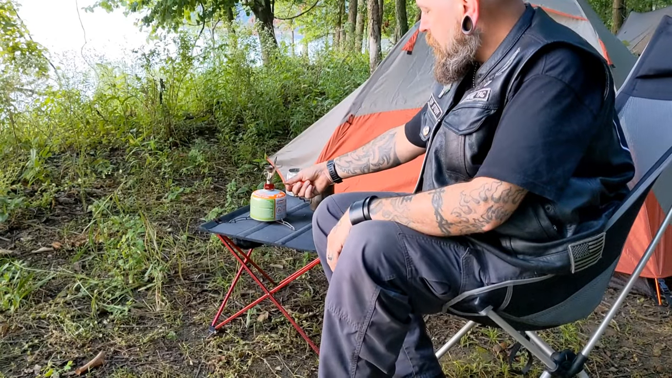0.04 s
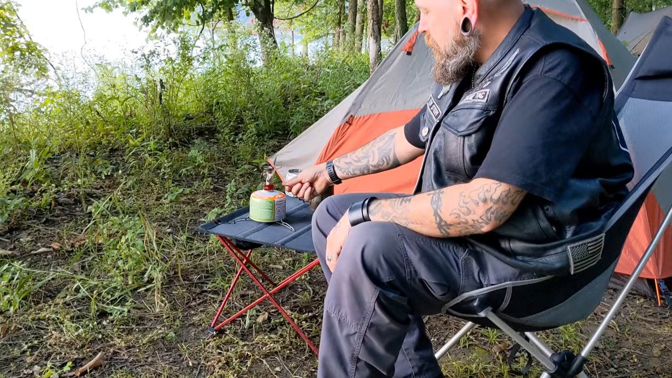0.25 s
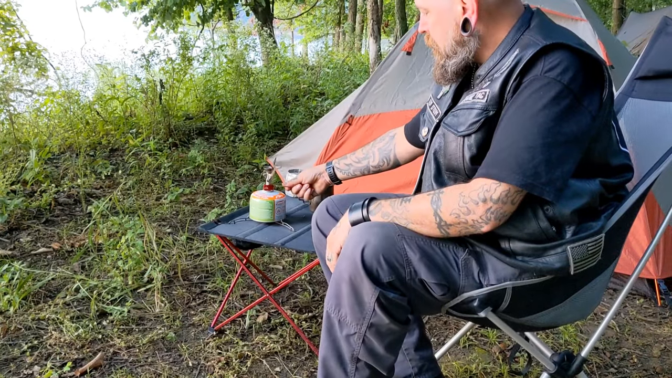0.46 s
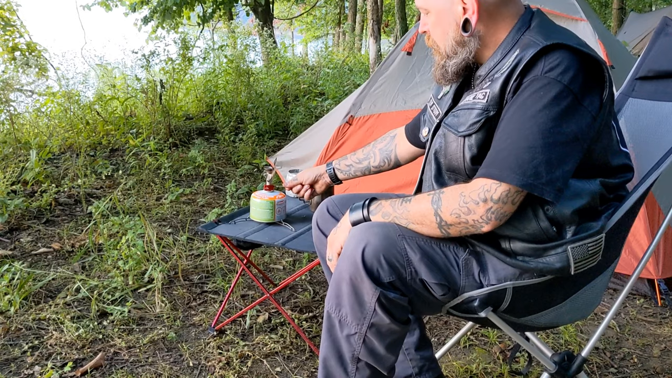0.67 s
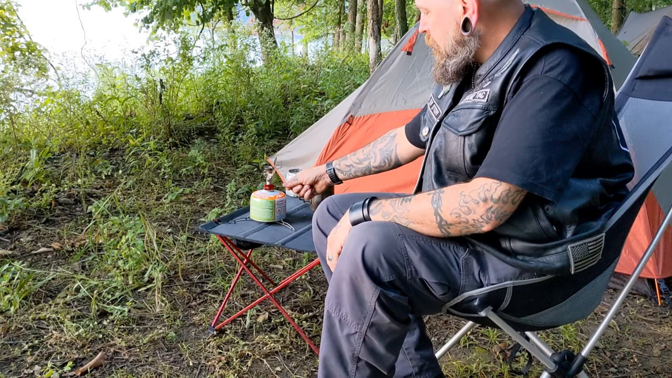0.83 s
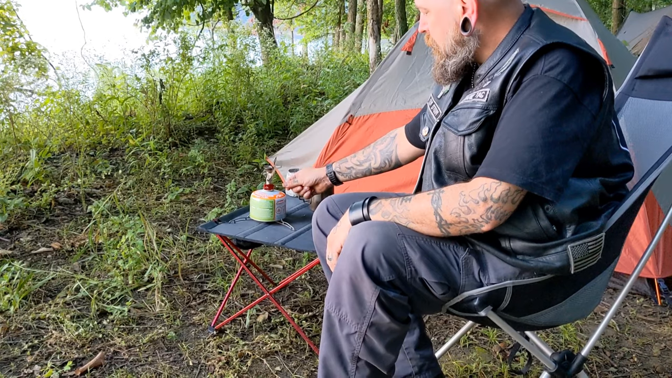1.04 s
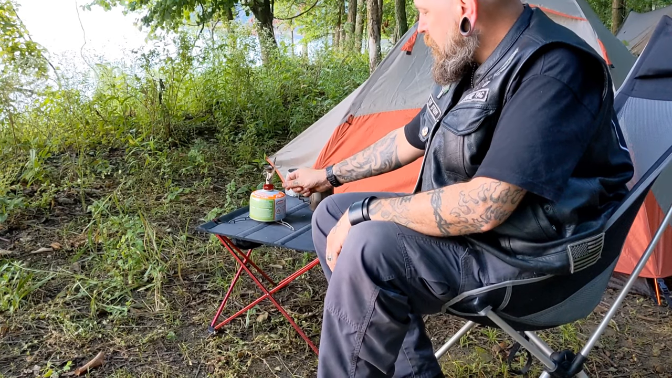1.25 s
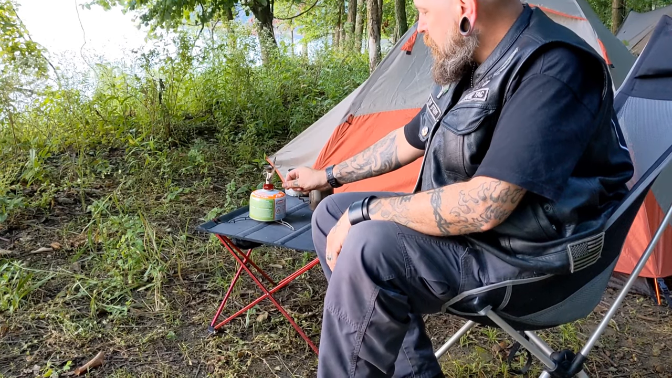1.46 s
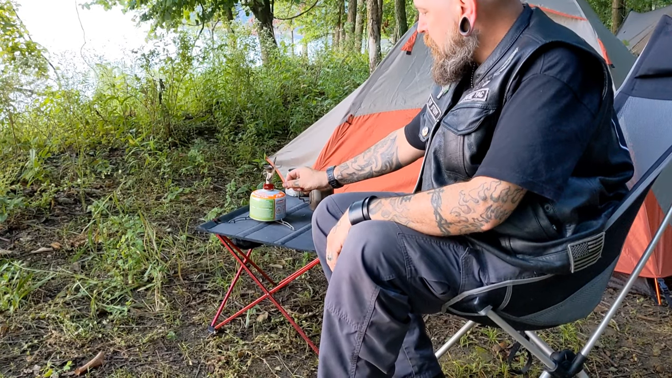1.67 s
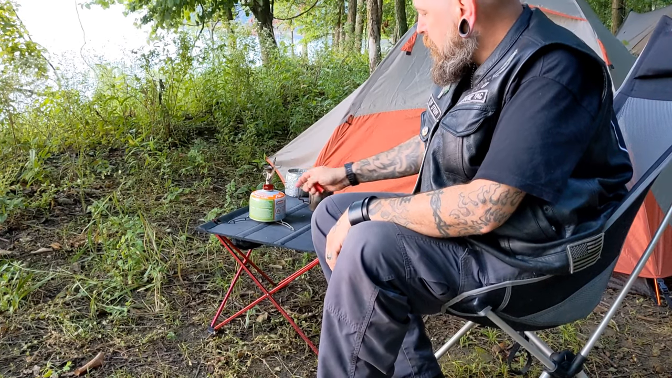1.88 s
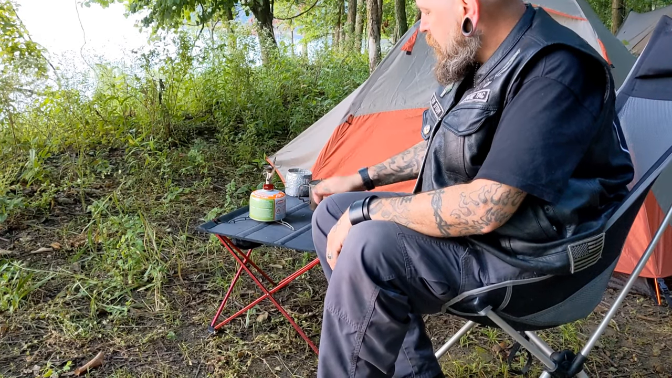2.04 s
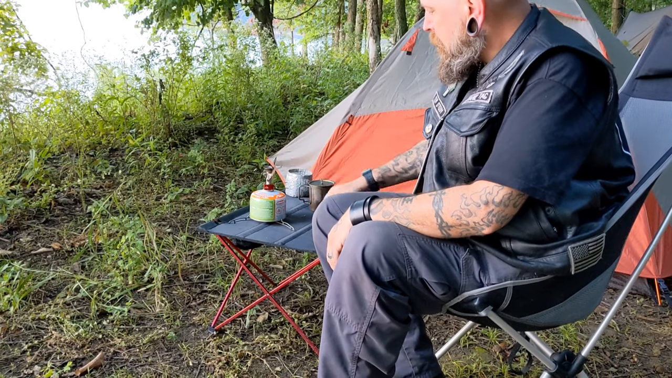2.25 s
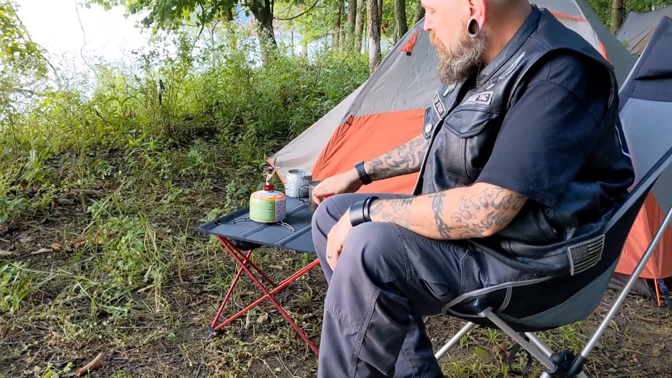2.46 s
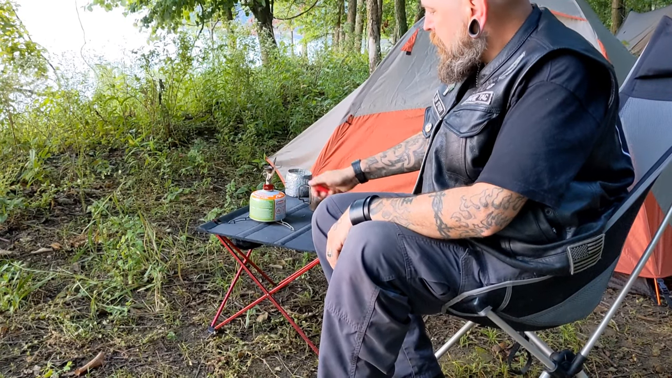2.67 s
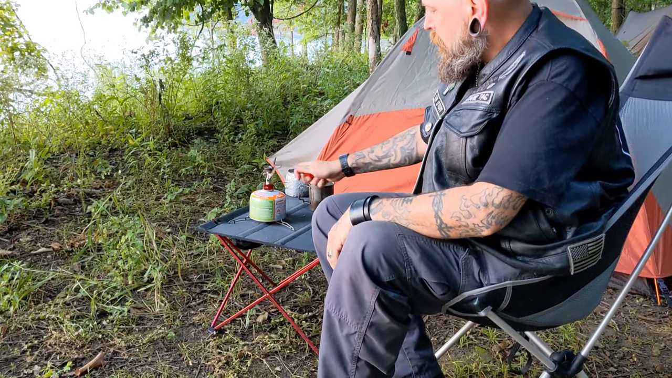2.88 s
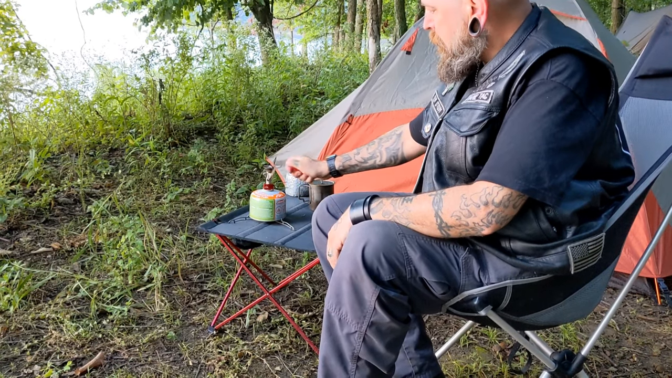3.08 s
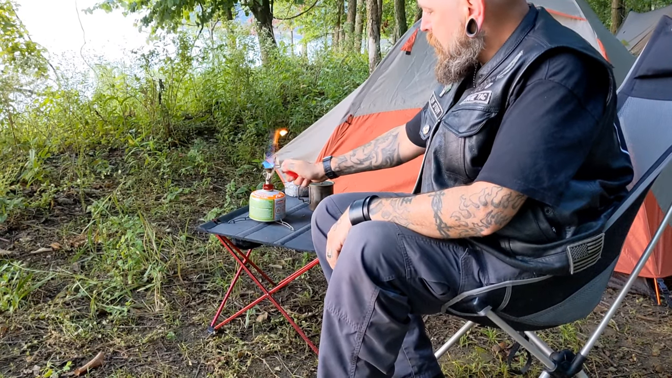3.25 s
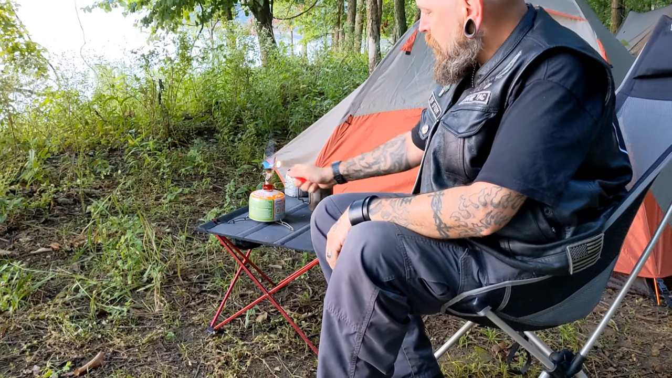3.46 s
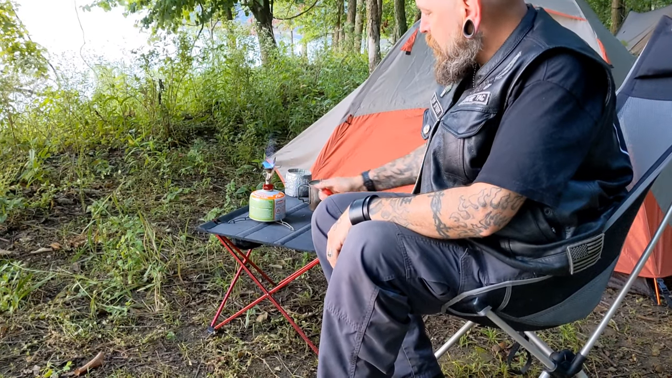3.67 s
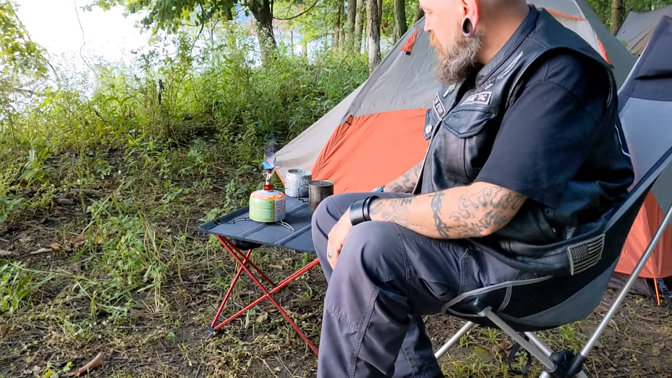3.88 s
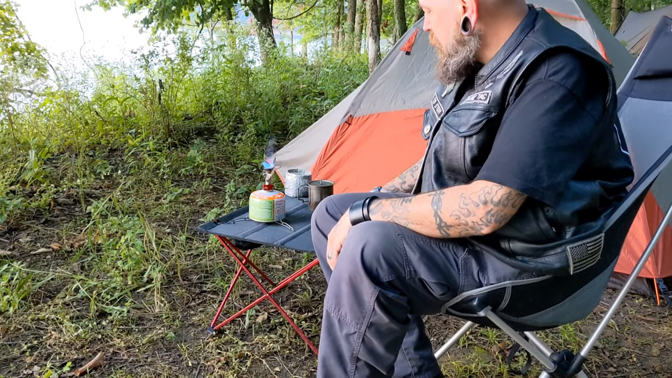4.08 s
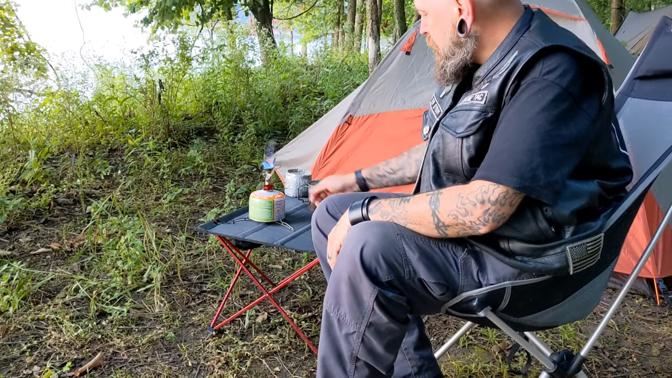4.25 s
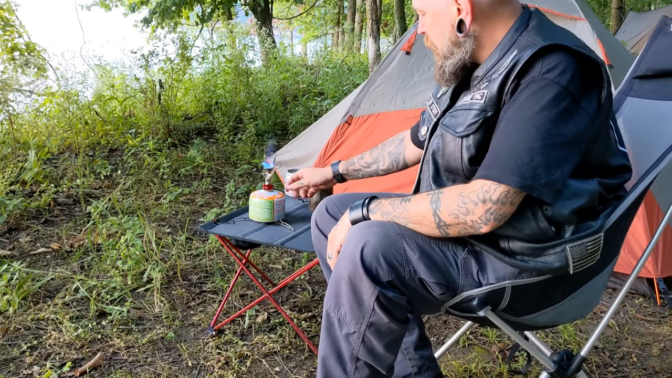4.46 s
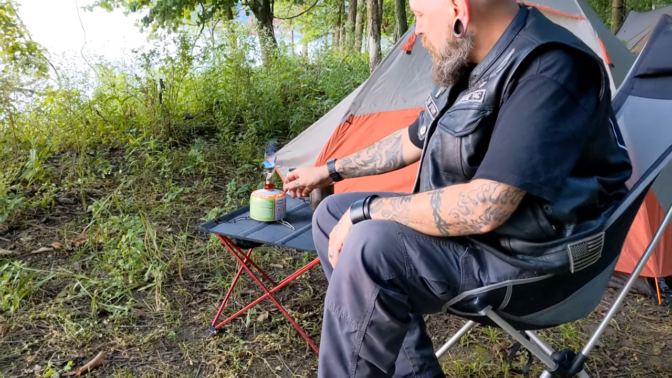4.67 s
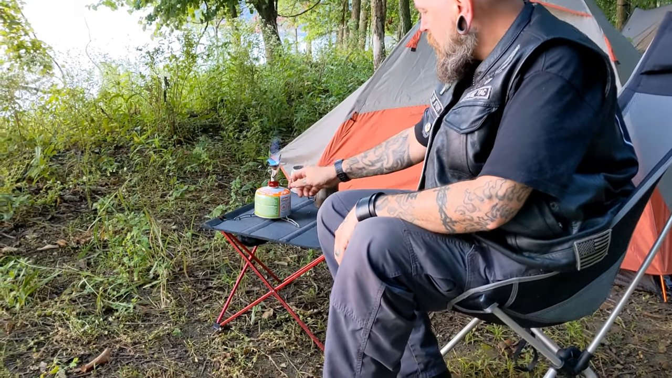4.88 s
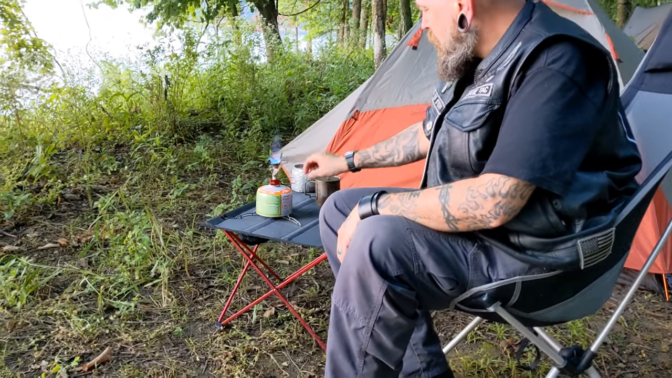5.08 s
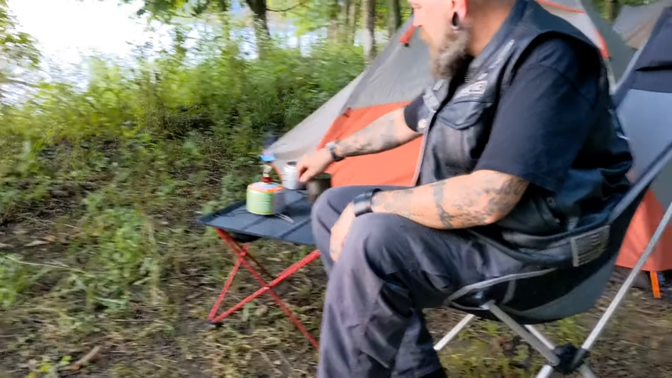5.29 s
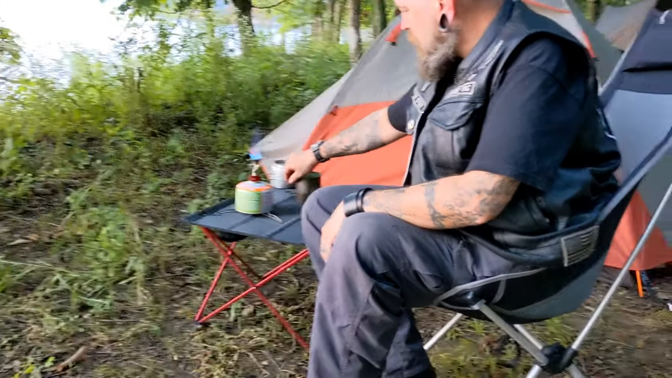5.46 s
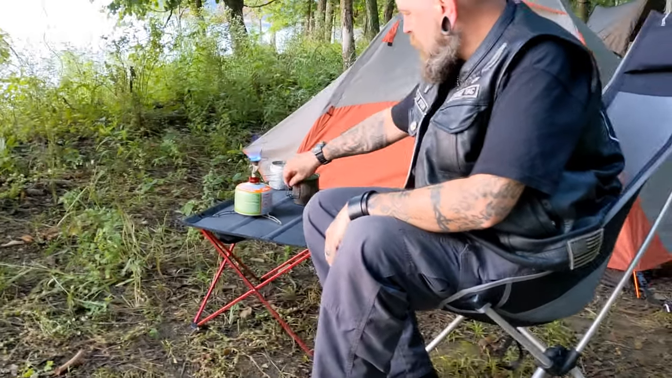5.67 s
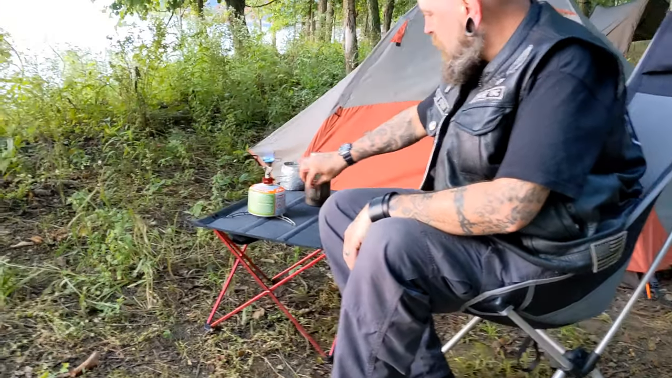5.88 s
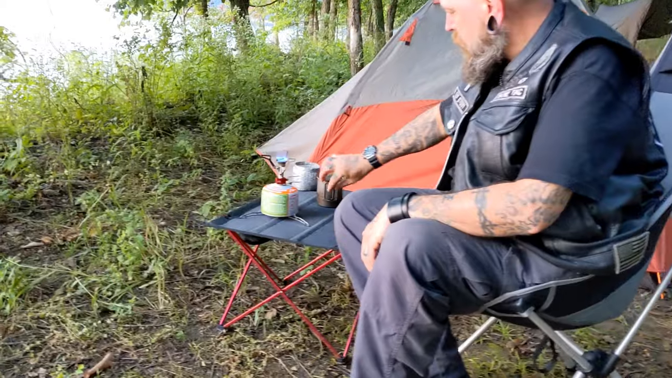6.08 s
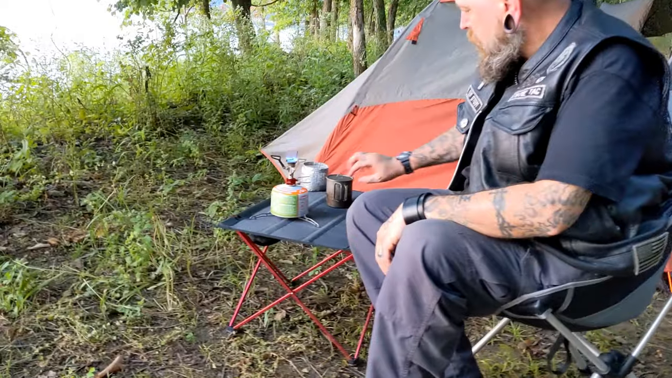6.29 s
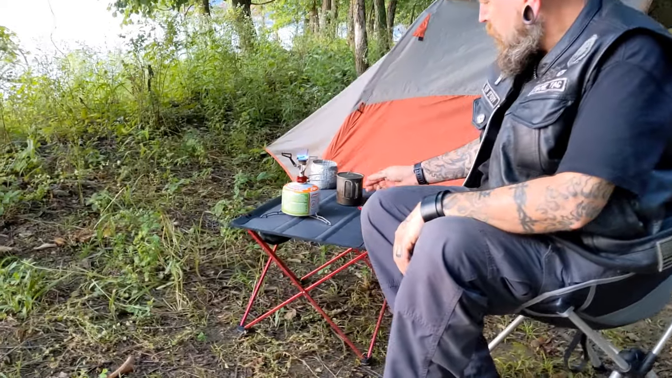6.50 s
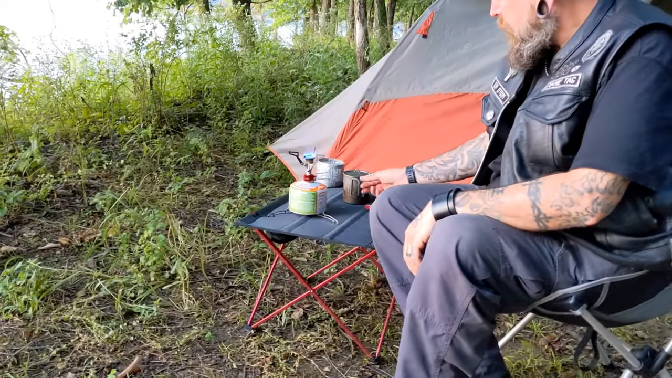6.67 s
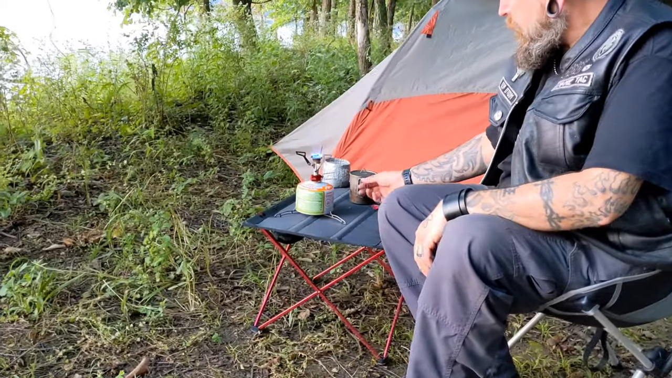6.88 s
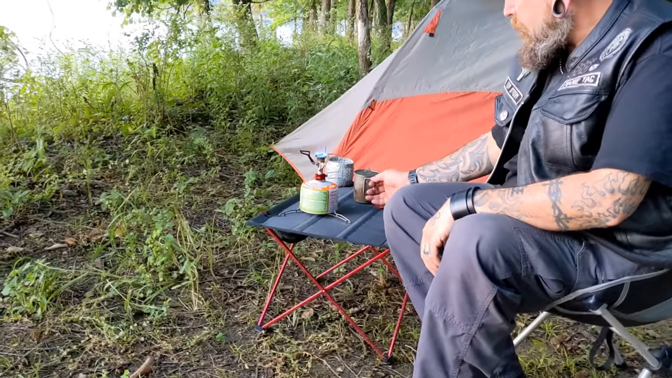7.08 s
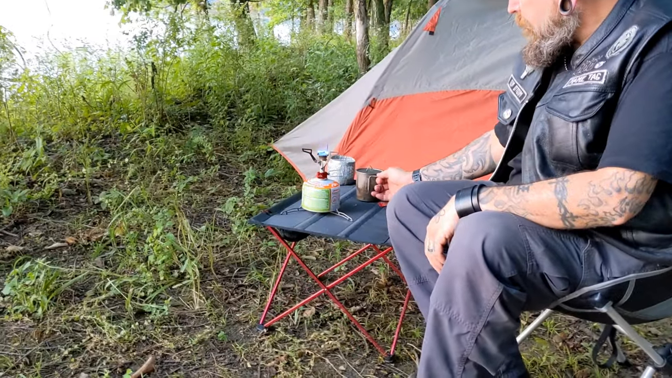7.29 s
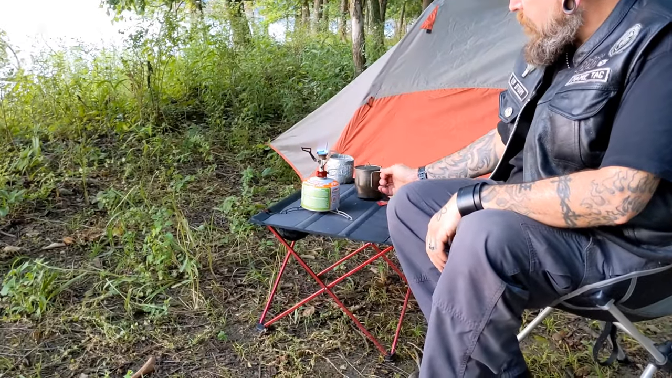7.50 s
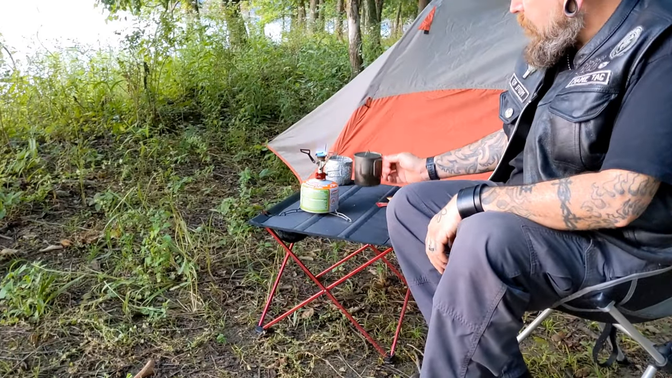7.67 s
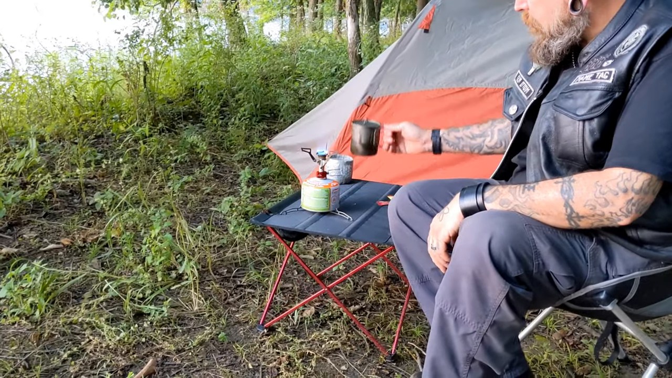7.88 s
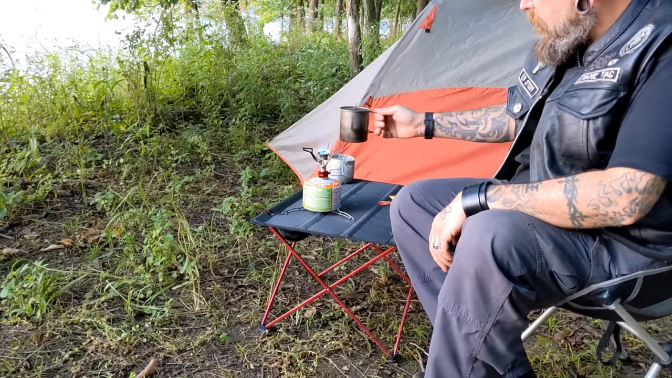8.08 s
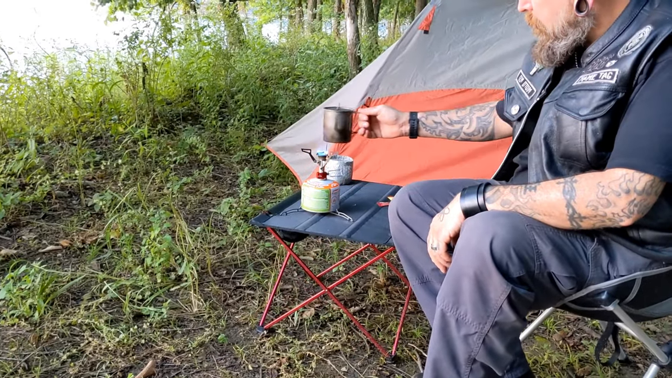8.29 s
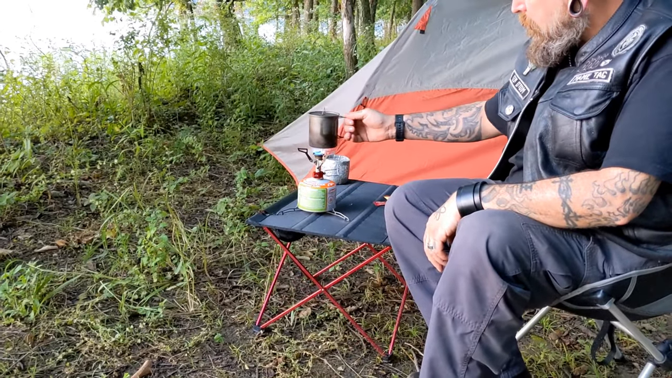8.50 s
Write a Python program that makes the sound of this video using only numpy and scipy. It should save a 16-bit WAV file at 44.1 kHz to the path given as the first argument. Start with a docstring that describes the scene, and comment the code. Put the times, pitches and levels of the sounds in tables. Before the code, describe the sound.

A quiet wooded campsite in stereo, with the microphone near a small gas stove. From 0 s a distant engine drones low and steady, leaning left, with dull rumble, soft wind buffets strongest near 0.6 s, faint leaves and thin high crickets. Birds chirp, warble and trill with slight woodland echo until about 3.2 s. At about 1.4 s the gas valve opens: a bright turbulent hiss swells, peaks near 1.8 s and settles. At 3.25 s a sharp double lighter click is followed at 3.3 s by a crackling whump and short flare, becoming a fluttering burner roar with airy jet hiss. It strengthens gradually to 8.5 s, its tone shifting around 6 s as the microphone moves. A tiny knock comes at 4.15 s, a thin tick at 5.55 s, a metal cup tapping down with a short rattling ring at 6.16 s, and another faint tick at 7.07 s.

```python
"""Camp stove lit in the woods

A gas valve opens and hisses, a lighter clicks, the gas catches with a thump and the burner roars on: coloured
noise with tabled levels, plus short pressure swings. A distant engine drones as sines over rumble, wind buffets
the microphone as low noise, birds are gliding sines with echoes, crickets are resonant noise. Ticks are noise
through metal resonances; a cup set down rings as decaying sines. Two channels: the microphone's ports."""
import sys
import numpy as np
from scipy import signal
from scipy.fft import rfft, irfft, next_fast_len
from scipy.io import wavfile

SR = 44100
rng = np.random.default_rng(int(sys.argv[2]) if len(sys.argv) > 2 else 0)


def wrap_up_sound(samples):
    """Save the sound to the file named by the first command line argument, as 16-bit audio."""
    columns = np.atleast_2d(samples).T
    # keep every value between -1 and 1, then stretch to whole-number steps
    tamed = np.clip(columns, -1, 1)
    steps = np.round(tamed * 32767).astype(np.int16)
    wavfile.write(sys.argv[1], SR, steps)


N = 376613


def undb(db):
    """Amplitude ratio of a level in dB."""
    return 10 ** (np.asarray(db) / 20)


def unit(x):
    """Scale to rms 1."""
    return x / np.sqrt(np.mean(x ** 2))


def decay(t, t60_s):
    """Exponential decay that falls 60 dB in t60_s."""
    return np.exp(-np.log(1000) * t / t60_s)


def curve(table):
    """Columns of a (t/s, ...) table as values per sample."""
    s, *columns = np.transpose(table)
    return [np.interp(np.arange(N) / SR, s, c) for c in columns]


def across(table, hz):
    """A (f/Hz, value) table read on a log-frequency axis."""
    f, v = np.transpose(table)
    return np.interp(np.log(hz + 1), np.log(f + 1), v)


def walk(rate_hz):
    """Random levels, rate_hz a second, joined smoothly; spread near 1."""
    levels = rng.standard_normal(int(N * rate_hz / SR) + 2)
    place = np.arange(N) * rate_hz / SR
    k = place.astype(int)
    blend = np.sin(np.pi / 2 * (place - k)) ** 2
    return levels[k] + (levels[k + 1] - levels[k]) * blend


def pan(left_minus_right_db):
    """Left and right gains of a level difference."""
    return undb(np.array([left_minus_right_db, -left_minus_right_db]) / 2)


def band(x, hz, width_hz):
    """A resonance of the given centre and width."""
    return signal.lfilter(*signal.iirpeak(hz, hz / width_hz, fs=SR), x)


def highpass(x, hz):
    """Second-order high-pass."""
    return signal.sosfilt(signal.butter(2, hz, "high", fs=SR, output="sos"), x)


# housing's effect at the ports on sound from ahead: f/Hz, left phase lead/rad, left minus right/dB
PORT_RESPONSE = [(350, -.2, .5), (600, -.09, .7), (1150, -.04, .3), (1450, -.09, -2.7), (1700, .2, -4.5),
                 (2070, 1.1, -4), (2410, 2.3, 1), (2720, 2.2, 5), (3700, 1.2, 7), (3960, 0.4, 6),
                 (4600, 0.1, 0.6), (5500, 2.2, 1.1), (6000, 2.6, 1.1), (8350, 3.5, 3), (11600, 4.5, 2.5),
                 (13100, 5.5, -1.5), (16000, 6.2, -2.1)]


def noise(colour, alike, ahead, centres_hz, flicker_db, rate_hz):
    """Two-port coloured noise in bands that each flicker; rms 1 in sum."""
    size = next_fast_len(N)
    hz = np.fft.rfftfreq(size, 1 / SR)
    gain = undb(across(colour, hz)) * (hz > colour[0][0]) * (hz < colour[-1][0])
    common, left, right = rfft(rng.standard_normal((3, size)))
    share = np.clip(across(alike, hz), 0, 1)  # power common to both ports
    port_hz, phase, side_db = np.transpose(PORT_RESPONSE)
    turn = np.exp(.5j * np.interp(hz, port_hz, phase)) if ahead else 1
    gain = gain * pan(np.interp(hz, port_hz, side_db) * ahead)
    shared, own = np.sqrt(share) * common, np.sqrt(1 - share)
    pair = gain * np.array([shared * turn + own * left, shared / turn + own * right])
    parts = []
    for one in np.eye(len(centres_hz)):
        part = across(list(zip(centres_hz, one)), hz)
        parts.append(irfft(pair * part, size)[:, :N] * undb(flicker_db * walk(rate_hz)))
    parts = np.array(parts)
    return parts / np.sqrt(np.mean(parts.sum(axis=0) ** 2))


CRANK_HZ = 26.34
# strongest engine line, 6 x crank rate: t/s, level/dB, left minus right/dB
MAIN_LINE = [(0, -47, 11.5), (1.28, -48, 14.5), (2.45, -44.5, 14), (3.69, -47, 17), (3.88, -50.5, 21.5),
             (4.3, -47.5, 16.5), (5.2, -47, 15), (5.6, -50, 19.5), (5.9, -47, 16), (6.49, -45.5, 11.5),
             (7.3, -46, 9), (8.54, -44.5, 6.5)]
# weaker engine lines: multiple of crank rate, mean level/dB, left minus right/dB
WEAK_LINES = [(3.043, -61.5, -2), (3.494, -54, 4), (7.01, -59.5, 1.5), (7.79, -78.5, 19),
              (10.63, -73, 18.5), (15.3, -81.5, 11), (17.58, -75.5, -4), (24.3, -79.5, -3)]
# upper part of the engine rumble: t/s, level/dB
UPPER_RUMBLE = [(0, -62), (1, -56), (2.4, -50.5), (3.6, -51), (5, -51.5), (6.6, -57), (7.5, -58.5),
                (8.54, -57)]
# rumble spectrum: f/Hz, relative density/dB
RUMBLE_SPECTRUM = [(40, -13), (60, 3.5), (90, 1), (130, 4), (220, 2.5), (300, -8), (450, -13.5), (680, -16),
                   (800, -47)]


def engine():
    """Steady lines on the crank rate that waver on their way through the air, over a dull rumble."""
    turn = 2 * np.pi * CRANK_HZ * np.arange(N) / SR
    db, pan_db = curve(MAIN_LINE)
    phase = 6 * turn + 0.25 * walk(7.6) + np.array([[-.15], [.15]])
    lines = np.sqrt(2) * np.sin(phase) * undb(db + 0.34 * walk(17)) * pan(pan_db)
    upper_db, = curve(UPPER_RUMBLE)
    for k, line_db, side_db in WEAK_LINES:
        # the higher lines come and go with the upper rumble
        line_db = line_db + min(k / 20, 1) * (upper_db - upper_db.mean())
        phase = k * turn + 0.12 * k * walk(5) + rng.uniform(0, 2 * np.pi)
        lines += np.sqrt(2) * np.sin(phase) * undb(line_db + 1.6 * walk(2.32)) * pan(side_db)[:, None]
    low, high = noise(RUMBLE_SPECTRUM, [(60, 0.93), (600, 0.92)], False, [90, 260], 0.46, 3.2)
    return lines + (low * undb(-51) + high * undb(upper_db)) * pan(4.6)[:, None]


# gusts on the microphone: t/s, peak of the level envelope/dB
GUST_PEAKS = [(.15, -54), (.6, -43), (1.5, -51), (1.95, -47), (2.72, -62), (3.25, -59), (3.93, -62),
              (4.5, -56), (5.55, -56), (5.85, -54), (6.15, -53), (6.6, -54), (6.93, -59), (7.75, -60)]
GUST_SIGMA_S, BREEZE_DB = 0.1, -69  # Gaussian gust; median level between gusts


def wind():
    """Low buffets that push one port while they pull the other."""
    colour = [(26, -30), (40, 6), (52, -12), (75, -4), (150, -24)]
    buffets, = noise(colour, [(50, 0.91)], False, [50], 3.8, 11.0)
    t = np.arange(0, N / SR, .01)
    swell = sum(undb(db) * np.exp(-.5 * ((t - s) / GUST_SIGMA_S) ** 2) for s, db in GUST_PEAKS)
    swell, = curve(np.transpose([t, swell]))
    force = undb(BREEZE_DB + 3.0 * walk(3)) + swell
    return buffets * force * np.array([[1], [-1]])


# far leaves: f/Hz, relative density/dB
LEAF_SPECTRUM = [(290, -40), (500, -10), (748, -7.5), (1390, -1), (1650, -7.5), (2470, -4), (3490, -10),
                 (4520, -9.5), (5150, -4), (5950, -13.5), (11500, -13), (15600, -27)]
LEAVES_DB = -63.5


def leaves():
    """Far leaves: faint broad noise, mostly unrelated at the two ports."""
    alike = [(600, 0.86), (1400, 0.18), (3000, 0.073)]
    return noise(LEAF_SPECTRUM, alike, True, [3000], 0.68, 3.6)[0] * undb(LEAVES_DB)


CRICKET_HZ, CHORUS_DB = 5215, -70  # narrow line; level of the wide band


def crickets():
    """A chorus of resonant noise: a wide band plus a narrow one that throbs irregularly."""
    hiss = rng.standard_normal((2, N))
    wide = unit(band(band(hiss, 5060, 600.), 5060, 600.))
    narrow = unit(band(hiss, CRICKET_HZ, 90.)) * undb(2.6 * walk(45))
    return (wide + 0.92 * narrow) * undb(CHORUS_DB)


# bird notes: t/s, length/s, start f/Hz, end f/Hz, level before mixing/dB, left minus right/dB
BIRD_NOTES = [(.272, .032, 3100, 2700, -64, 4), (.3, 0.039, 2550, 2490, -66, 0),
              (.328, 0.061, 2470, 2310, -61.5, -2), (.385, .06, 2400, 2330, -73, 0),
              (.27, .05, 4080, 4170, -75, 2), (.52, 0.045, 2490, 2460, -69, -3),
              (0.545, 0.021, 2390, 2100, -62, 2), (0.575, 0.07, 2090, 2080, -67, 0),
              (.545, .025, 3980, 4200, -74, 2), (.765, .05, 3200, 3120, -71, 2),
              (0.866, 0.036, 3800, 3120, -65, 6), (0.901, .05, 3120, 2280, -65, 6),
              (1.055, .055, 3060, 3050, -67, 2), (1.106, 0.06, 3120, 2120, -62, 4),
              (1.135, .045, 2520, 2460, -67, 2), (1.198, 0.068, 2460, 2520, -65, 2),
              (1.228, 0.029, 2660, 2970, -61, 7), (1.263, .045, 2910, 2880, -58.5, 5),
              (1.3, .1, 2870, 2850, -71, 2), (1.48, 0.075, 2500, 2500, -69, 4),
              (1.557, 0.031, 2800, 2770, -59.5, 11), (1.608, 0.025, 2420, 2150, -58, -2),
              (1.708, 0.062, 2390, 2130, -60, 0), (1.827, .04, 3050, 3150, -70, 4),
              (2.16, .04, 3050, 2820, -62, 4), (2.207, 0.094, 3020, 3120, -66, 7),
              (2.706, 0.05, 3100, 2740, -62, 4), (2.783, 0.065, 2550, 2450, -62, 2),
              (2.845, .065, 2470, 2400, -70, 0), (2.865, 0.055, 4480, 4680, -66, 0),
              (2.948, 0.03, 3150, 3480, -62, 4), (2.973, .035, 2680, 3060, -61, 3),
              (2.975, 0.075, 4540, 4200, -66, 2), (3.057, 0.024, 3260, 2880, -59, 4),
              (3.075, .09, 3300, 3720, -68, 3), (3.123, .03, 2600, 2300, -68, 2)]
# phrase repeats of a small high-voiced bird: t/s, level before note offset and mixing/dB
PHRASE_STARTS = [(-.06, -67), (0.678, -67), (1.27, -67), (1.86, -67), (2.449, -64.5)]
# its two falling notes: delay/s, length/s, start f/Hz, end f/Hz, level offset/dB, left minus right/dB
PHRASE_NOTES = [(-.03, .26, 6850, 5560, -4, -11), (.03, .22, 7850, 6640, -3.5, -1)]
# fluttering notes: t/s, length/s, start f/Hz, end f/Hz, level before beat and mixing/dB,
# left minus right/dB, beat rate/Hz, pitch swing/1
TRILL_NOTES = [(0, 0.042, 3230, 3000, -65.5, 6, 39, 0.12), (.05, .07, 3510, 4050, -73, 1, 50, .04),
               (0.139, 0.12, 2580, 2560, -64, 5, 68, 0.06), (0.867, .085, 3830, 3940, -69.5, 8, 63, .04),
               (0.941, 0.07, 3200, 3600, -67, 4, 50, 0.1)]
TRILL_BEAT = .65  # amplitude modulation depth
NOTE_SHARE, ECHO_SHARE = .85, .62  # direct and echo gains


def birds():
    """Gliding, warbling sines, blurred by decaying-noise echoes among the trees."""
    notes, warble, shrill, throb = np.zeros((2, N)), walk(160), walk(170), walk(90)
    phrases = [(s + late, length, hz0, hz1, db + note_db, pan_db) for s, db in PHRASE_STARTS
               for late, length, hz0, hz1, note_db, pan_db in PHRASE_NOTES]
    for s, length, hz0, hz1, db, pan_db in BIRD_NOTES + phrases:
        # a note that starts before zero enters partway
        u = np.arange(max(-int(s * SR), 0), int(length * SR)) / (length * SR)
        i = max(int(s * SR), 0)
        span = slice(i, i + len(u))
        # the small high-voiced bird warbles more widely
        wobble = 0.041 * shrill[span] if hz0 > 5000 else 0.0217 * warble[span]
        hz = (hz0 + (hz1 - hz0) * u) * (1 + wobble)
        note = np.sin(2 * np.pi * np.cumsum(hz) / SR) * np.sqrt(np.sin(np.pi * u)) * undb(1.9 * throb[span])
        notes[:, span] += undb(db) * pan(pan_db)[:, None] * note
    for s, length, hz0, hz1, db, pan_db, rate_hz, swing in TRILL_NOTES:
        t = np.arange(int(length * SR)) / SR
        i = int(s * SR)
        span = slice(i, i + len(t))
        beat = 2 * np.pi * rate_hz * t + 0.88 * throb[span]
        hz = (hz0 + (hz1 - hz0) * t / length) * (1 + swing * np.cos(beat) + 0.014 * warble[span])
        envelope = np.sin(np.pi * t / length) ** .3 * (1 + TRILL_BEAT * np.sin(beat))
        note = np.sin(2 * np.pi * np.cumsum(hz) / SR) * envelope
        notes[:, span] += undb(db) * pan(pan_db)[:, None] * note
    t = np.arange(SR // 3) / SR
    trees = rng.standard_normal((2, len(t))) * decay(t, 0.4) * np.clip(t / 0.017, 0, 1)
    echoes = signal.fftconvolve(notes, trees / np.sqrt(np.sum(trees ** 2) / 2), axes=1)[:, :N]
    return NOTE_SHARE * notes + ECHO_SHARE * echoes


# late path off the table top, changing as the microphone shifts: t/s, left delay/ms, right delay/ms
BOUNCE_DELAYS = [(0, 0.69, 0.59), (5.3, 0.61, 0.87), (6.2, 0.69, 0.57), (7, 0.73, 0.69), (8.54, 0.88, 0.78)]
BOUNCE_SHARE = 0.16  # amplitude of the late copy


def bounce(x):
    """Adds the late copy, which combs the hiss into drifting ridges."""
    place = np.arange(N)
    late = [np.interp(place - ms * SR / 1000, place, side) for side, ms in zip(x, curve(BOUNCE_DELAYS))]
    return x + BOUNCE_SHARE * np.array(late)


LIGHTS_S = 3.2935  # the gas catches
# gas and flame: f/Hz, power share common to both ports
STOVE_COMMON = [(300, 0.95), (700, 1), (1400, 0.95), (2400, 0.48), (5000, 0.53), (9000, 0.18),
                (15000, 0.43)]


def lit_share(since_s):
    """Crossfade from cold gas to flame in 7.5 ms."""
    return np.clip(since_s / 0.0075, 0, 1)


# valve opens, overshoots and settles: t/s, level/dB, treble level/dB
GAS_LEVELS = [(1.36, -81, -75), (1.45, -65, -63), (1.54, -63, -59), (1.62, -57.5, -58), (1.75, -52, -49.5),
              (1.86, -52.5, -47.5), (1.92, -54, -49), (2.07, -55.5, -52.5), (2.5, -57.5, -54.5),
              (3.24, -56.5, -54.5)]
# cold gas: f/Hz, relative density/dB
GAS_SPECTRUM = [(1060, -29), (1800, -14.5), (2360, -11.5), (3040, -8.5), (3390, -9.5), (3700, -2),
                (3960, 3.5), (4130, 1), (4340, -10.5), (4560, -2.5), (4850, -13.5), (5370, -4.5),
                (6610, -22), (7170, -19), (10600, -17), (11500, -13.5), (12800, -27), (14800, -26),
                (15600, -36)]


def cold_gas():
    """Unlit jet: flickering turbulent hiss, until the gas catches."""
    t = np.arange(N) / SR
    gas_db, treble_db = curve(GAS_LEVELS)
    low, high = noise(GAS_SPECTRUM, STOVE_COMMON, True, [5000, 9000], 1.0, 14.0)
    gas = (low * undb(gas_db) + high * undb(treble_db)) * (t > GAS_LEVELS[0][0])
    return bounce(gas) * (1 - lit_share(t - LIGHTS_S))


# lighter clicks, later ticks: t/s, crack level/dB, rise/s, crack t60/s, high-pass f/Hz,
# tail re crack/dB, tail t60/s, knock level/dB, left minus right/dB
TICK_EVENTS = [(3.2525, -30, 0.0038, 0.0066, 3600, -30, .02, -51, 1),
               (3.2562, -24, 0.0016, 0.013, 3200, -30, 0.058, -51, 5.5),
               (3.262, -43.5, 0.0092, 0.19, 4500, -8, .2, -55, 3),
               (4.15, -57, .002, .02, 4000, -15, .05, -47, 0),
               (5.548, -39.5, 0.0037, .018, 9000, -20, .06, -60, 10),
               (6.162, -46.5, 0.0024, 0.03, 4500, 3.5, 0.26, -39, 6),
               (7.065, -40.5, 0.0031, 0.013, 9500, -14, 0.2, -55, 3)]
# metal resonances: f/Hz, width/Hz, gain/dB, left minus right/dB
METAL_MODES = [(1340, 360, 2, 1), (2480, 900, -17, 0), (3800, 640, 1.5, 2), (5660, 1700, -2.5, 3),
               (7060, 880, -3.5, -10), (8100, 790, -2.5, -4), (10200, 2000, 2, -4.5),
               (12400, 1000, -18, -15), (14600, 1300, -20, -6)]
# table top: f/Hz, width/Hz, gain/dB
TABLE_MODES = [(650, 350, 16), (1260, 220, 3), (2330, 1100, -3)]


def ticks():
    """Noise crack and scraping tail through metal modes, partly antiphase at the ports, plus a table knock."""
    out = np.zeros((2, N))
    t = np.arange(SR // 4) / SR
    for s, db, rise, crack_t60, low_hz, tail_db, tail_t60, knock_db, pan_db in TICK_EVENTS:
        after = np.maximum(t - rise, 0)
        attack = np.clip(t / rise, 0, 1)
        crack = attack ** 2 * decay(after, crack_t60)
        scrape = attack * undb(tail_db) * decay(after, tail_t60)
        chance = rng.standard_normal((3, len(t)))
        strike = 0.18 * chance[0] * np.array([[1], [-1]]) + chance[1:]
        ring = sum(undb(gain_db) * pan(lean_db)[:, None] * band(strike, hz, width)
                   for hz, width, gain_db, lean_db in METAL_MODES)
        ring = unit(highpass(ring, low_hz)) * (crack + scrape)
        knock = unit(sum(undb(gain_db) * band(chance[0], hz, width) for hz, width, gain_db in TABLE_MODES))
        i = int(s * SR)
        out[:, i:i + len(t)] += undb(db) * pan(pan_db)[:, None] * ring + undb(knock_db) * knock * crack
    return out


# burner flutter, then fireball thump: t/s, start f/Hz, end f/Hz, level before shaping/dB, length/s
PRESSURE_SWINGS = [(3.2975, 1200, 1400, -38, .0085), (3.3068, 72, 42, -25.5, .037)]
CRACK_HZ, CRACK_DB, CRACK_T60_S = 1500, -40, 0.041
WHOOSH_DB, WHOOSH_T60_S = -12, 0.23  # slower tail, level re crack


def catch():
    """Short swings of pressure and a crack of noise as the gas cloud lights."""
    out = np.zeros(N)
    for s, hz0, hz1, db, length in PRESSURE_SWINGS:
        u = np.arange(int(length * SR)) / (length * SR)
        i = int(s * SR)
        swing = np.sin(2 * np.pi * np.cumsum(hz0 + (hz1 - hz0) * u) / SR)
        out[i:i + len(u)] += undb(db) * swing * np.sin(np.pi * u) ** 0.3 * (1 - .6 * u ** 2)
    t = np.arange(SR // 5) / SR
    i = int(LIGHTS_S * SR)
    crack = unit(band(band(rng.standard_normal(len(t)), CRACK_HZ, 1300.0), CRACK_HZ, 1300.0))
    fade = decay(t, CRACK_T60_S) + undb(WHOOSH_DB) * decay(t, WHOOSH_T60_S)
    out[i:i + len(t)] += undb(CRACK_DB) * crack * np.clip(t / 0.0056, 0, 1) * fade
    return highpass(out, 30.) * pan(2.1)[:, None]


# housing colour of the burning sound: f/Hz, gain before move/dB, gain after move/dB
HOUSING_GAINS = [(1440, -0.5, -0.5), (1830, 4.5, -3.5), (2050, -5.5, 0.5), (2230, 1.5, -4), (2620, -3.5, 2),
                 (2970, 1.5, -2.5), (3200, -1.5, -5), (3500, 0.5, -0.5), (3850, 2.5, -4), (4150, -0.5, 1.5),
                 (4370, -2.5, 1.5), (4950, -3.5, 0), (5540, -1.5, -2.5), (5780, 3.5, 1), (6100, -3.5, -1),
                 (6600, -1, 0)]
MOVE_START_END_S = (5.9, 6.45)  # the microphone is moved


def housing(x):
    """Glides from the colour before the move to the colour after it."""
    size = next_fast_len(N)
    hz, spectrum = np.fft.rfftfreq(size, 1 / SR), rfft(x, size)
    at_hz, *sides_db = np.transpose(HOUSING_GAINS)
    before, after = (irfft(spectrum * undb(np.interp(hz, at_hz, db)), size)[:, :N] for db in sides_db)
    moved = np.interp(np.arange(N) / SR, MOVE_START_END_S, [0, 1])
    return before + (after - before) * moved


WHISTLE_WIDTH_HZ, WHISTLE_PAN_DB = 530, 3


def whistle(table):
    """A narrow band of noise whose centre creeps: low-passed complex noise on a gliding carrier."""
    hz, db = curve(table)
    lowpass = signal.butter(2, WHISTLE_WIDTH_HZ / 2, fs=SR, output="sos")
    slow = signal.sosfilt(lowpass, rng.standard_normal((4, N)))
    carrier = np.exp(2j * np.pi * np.cumsum(hz) / SR)
    breath = np.real((slow[:2] + 1j * slow[2:]) * carrier)
    return unit(breath) * undb(db + 1.3 * walk(14)) * pan(WHISTLE_PAN_DB)[:, None]


# flame grows as the valve opens further: t/s, strength/dB, middle hiss/dB, upper hiss/dB, top hiss/dB
FLAME_LEVELS = [(3.36, -5.5, -53.5, -50, -52), (3.6, -5, -53, -60, -53.5), (4, -4.5, -55, -54.5, -54),
                (4.5, -4, -54.5, -57.5, -54.5), (5, -2, -49.5, -55.5, -52.5),
                (5.45, -1.5, -55.5, -55, -53.5), (5.65, -1, -55, -52.5, -52), (5.88, -0.5, -55, -51, -48.5),
                (6.1, 0, -50.5, -53.5, -51), (6.28, 0, -51.5, -53.5, -55), (6.9, 1.5, -53.5, -54.5, -56.5),
                (7.15, 1, -52, -51, -51), (7.3, 1, -54.5, -58.5, -54.5), (7.8, 0.5, -56, -56.5, -58),
                (8.07, 1.5, -49.5, -50, -53.5), (8.25, 2.5, -50.5, -52, -54), (8.54, 3, -51.5, -56, -55.5)]
# roar: f/Hz, relative density/dB
ROAR_SPECTRUM = [(150, -54), (250, -9), (274, -21), (318, -3.5), (366, -2), (421, -8), (476, -3.5),
                 (646, 0.5), (1030, -8.5), (1120, -3.5), (1340, -1), (1440, -3), (1660, -17), (1800, -35),
                 (2340, -35), (3960, -120)]
# burning jet: f/Hz, relative density/dB
HISS_SPECTRUM = [(940, -14), (1600, -6.5), (1990, 0), (2170, 1.5), (2460, -4.5), (2940, 0), (3560, -10.5),
                 (4440, -6), (5790, -4), (6500, -7), (7200, -7.5), (8400, -13.5), (9600, -10.5),
                 (10600, -13.5), (11250, -8), (12000, -13), (12800, -16.5), (14900, -20), (15600, -24)]
# breathy jet whistle: t/s, f/Hz, level/dB
JET_WHISTLE = [(3.36, 11300, -68), (4.1, 11280, -67), (4.85, 11200, -70), (5.15, 11300, -75),
               (5.5, 11260, -63), (5.68, 11300, -70), (5.87, 11500, -68), (6.15, 11350, -74),
               (6.3, 11400, -79), (7.3, 11500, -78), (7.8, 11450, -68), (8.07, 11450, -85),
               (8.43, 11500, -69), (8.54, 11500, -70)]
# fainter breathy band sliding down: t/s, f/Hz, level/dB
SLIDING_BAND = [(5.25, 7850, -95), (5.42, 7800, -71), (5.7, 7500, -68), (5.88, 7200, -68),
                (6.05, 7050, -95)]
# level/dB at strength 0 dB, slope dB/dB of strength
ROAR, UPPER_ROAR, LOW_HISS = (-46, 0.67), (-46.5, 1.15), (-52.5, 1)
FLARE_DB, FLARE_T60_S = 19.5, 0.067  # extra roar on lighting, re steady roar


def burner():
    """Flame roar that flares on lighting and flutters, with turbulent jet hiss and breathy whistles."""
    since = np.maximum(np.arange(N) / SR - LIGHTS_S, 0)
    strength_db, middle_db, upper_db, top_db = curve(FLAME_LEVELS)

    def grown(part):
        """Gain that follows flame strength."""
        level_db, slope = part
        return undb(level_db + slope * strength_db)

    flutter_db = 0.78 * walk(18) + 0.59 * walk(120)
    flare = 1 + undb(FLARE_DB) * decay(since, FLARE_T60_S)
    low, high = noise(ROAR_SPECTRUM, STOVE_COMMON, True, [900, 1120], 0.7, 13.0)
    roar = (low * grown(ROAR) + high * grown(UPPER_ROAR)) * undb(flutter_db) * flare
    low, middle, upper, top = noise(HISS_SPECTRUM, STOVE_COMMON, True, [2840, 4430, 7350, 8100], 0.6, 14.)
    hiss = low * grown(LOW_HISS) + middle * undb(middle_db) + upper * undb(upper_db) + top * undb(top_db)
    burning = housing(bounce(hiss * undb(1.6 * flutter_db)) + roar)
    burning = burning + whistle(JET_WHISTLE) + whistle(SLIDING_BAND)
    return burning * lit_share(since)


# metal cup set down, bouncing: t/s, level re modes/dB, left minus right/dB
CUP_HITS = [(6.1625, -38, 1), (6.167, -48, -4)]
# cup modes: f/Hz, gain/dB, t60/s
CUP_RESONANCES = [(654, 6.5, 0.028), (1280, -11, 0.021), (5300, -13, 0.11), (7140, -12, 0.15),
                  (8160, -20, 0.1), (10940, -18, .14), (10910, -10, 0.16), (11570, -11, 0.16),
                  (12440, -14, 0.08), (13410, -24, 0.1)]
CUP_RATTLE_DB, CUP_RATTLE_S = 5, .004  # spread and step


def cup():
    """Each tap rings the cup's modes; the upper ones rattle unevenly, in unrelated phase at the ports."""
    out = np.zeros((2, N))
    t = np.arange(SR // 4) / SR
    steps = np.arange(0, t[-1] + CUP_RATTLE_S, CUP_RATTLE_S)
    for s, db, pan_db in CUP_HITS:
        i = int(s * SR)
        for hz, mode_db, t60 in CUP_RESONANCES:
            high = hz > 2000
            rattle_db = high * CUP_RATTLE_DB * np.interp(t, steps, rng.standard_normal(len(steps)))
            ring = decay(t, t60) * np.sin(2 * np.pi * (hz * t + high * rng.random((2, 1))))
            gain = undb(db + mode_db + rattle_db) * pan(pan_db)[:, None]
            out[:, i:i + len(t)] += gain * ring * np.clip(t / 0.00092, 0, 1)
    return out


def scene():
    """Sum of all sources at the two ports."""
    surroundings = engine() + wind() + leaves() + crickets() + birds()
    return surroundings + cold_gas() + ticks() + catch() + burner() + cup()


TOP_HZ = 15600


def record(dry):
    """The recorder cuts the top: steep elliptic low-pass."""
    return signal.sosfilt(signal.ellip(10, .2, 70, TOP_HZ, fs=SR, output="sos"), dry)


dry = scene()
out = record(dry)
wrap_up_sound(out)
```